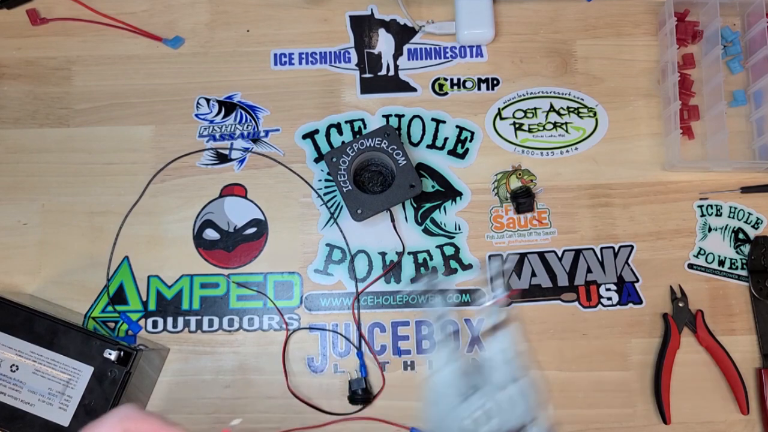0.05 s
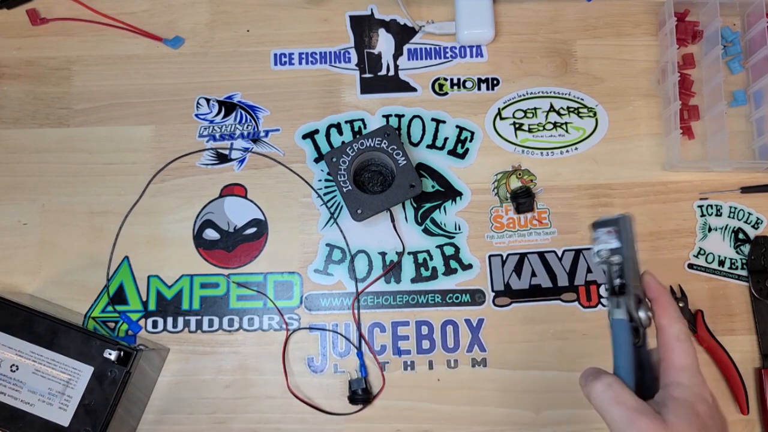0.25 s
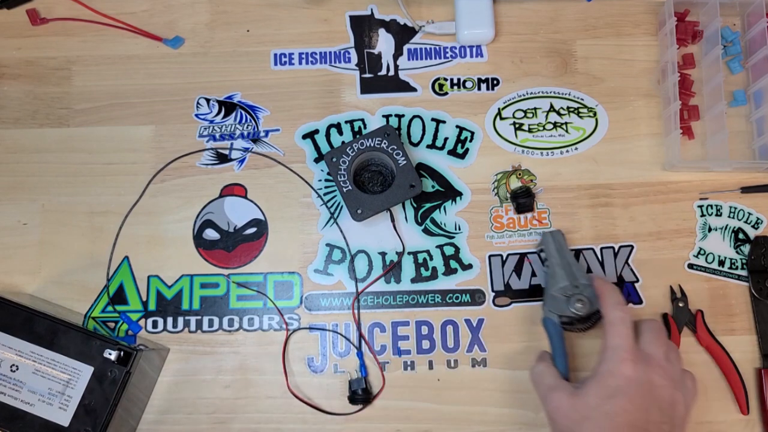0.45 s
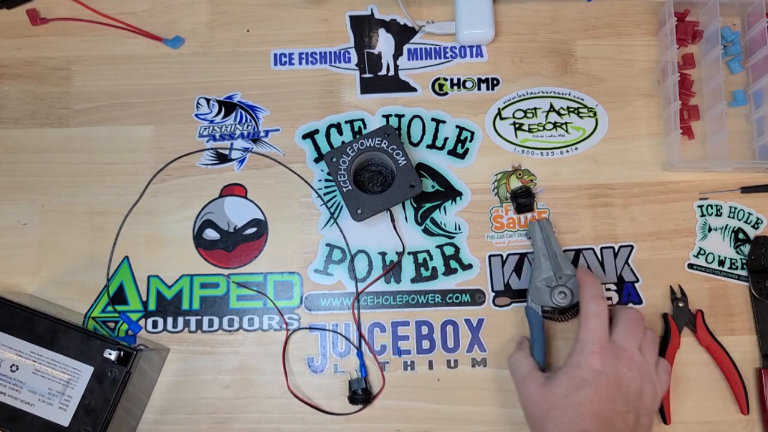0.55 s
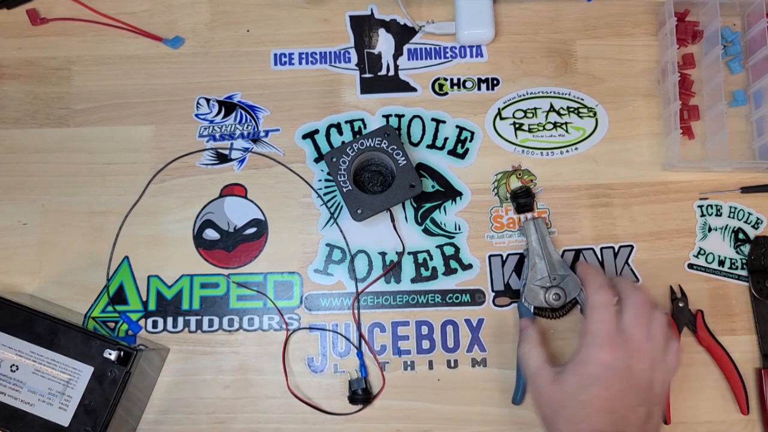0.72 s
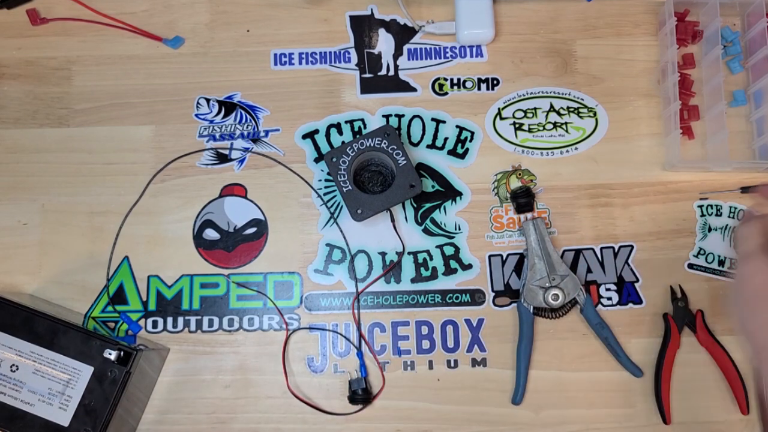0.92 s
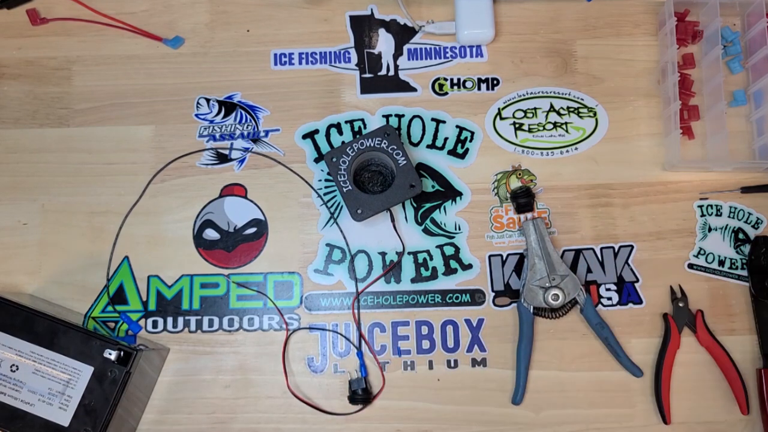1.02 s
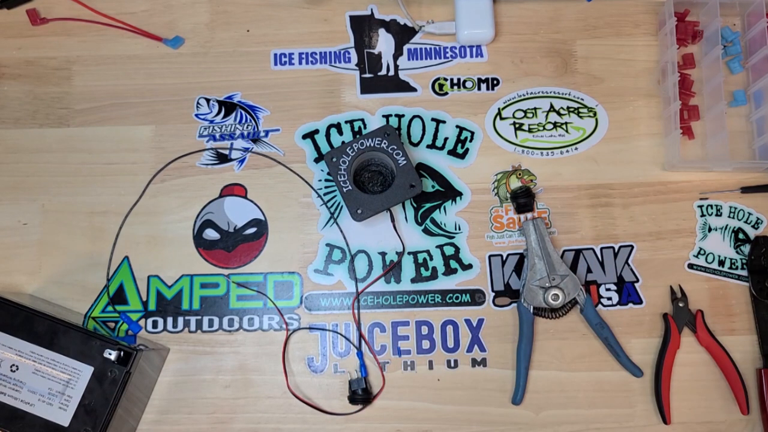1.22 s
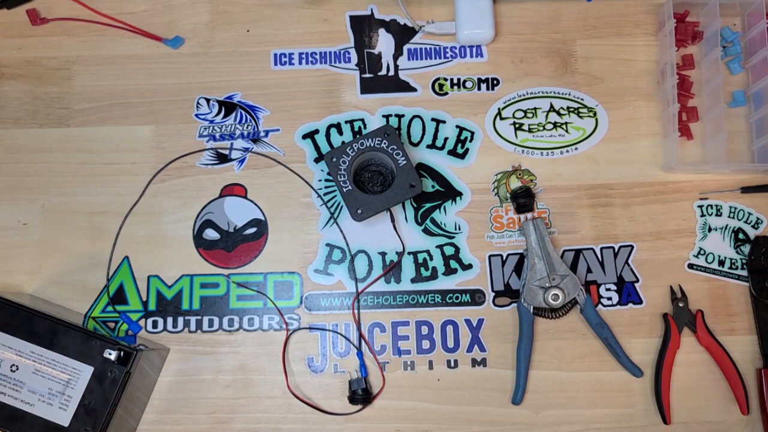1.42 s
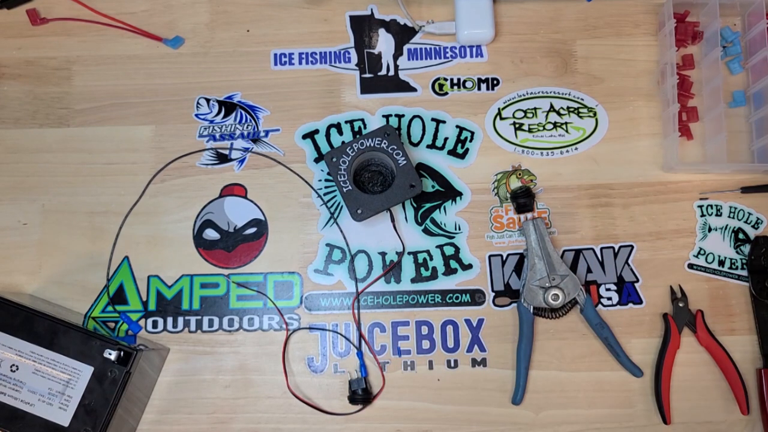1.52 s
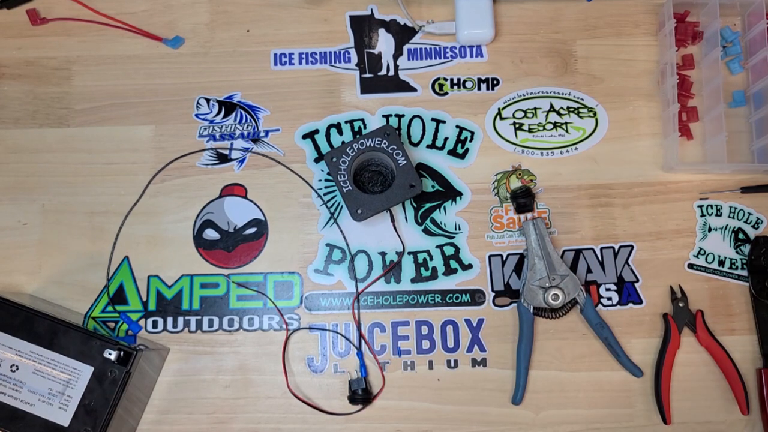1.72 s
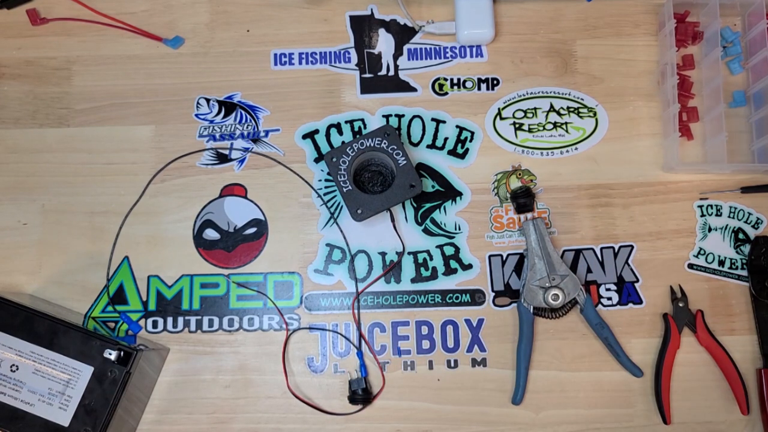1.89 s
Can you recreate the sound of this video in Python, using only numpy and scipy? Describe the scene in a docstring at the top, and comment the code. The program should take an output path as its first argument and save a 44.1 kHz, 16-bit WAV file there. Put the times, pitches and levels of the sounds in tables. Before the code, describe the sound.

In a small workshop with a low humming fan, wire strippers spring open sharply, their head then handles knock on a wooden bench, and a hard object clacks and ticks faintly, heard close in stereo.

```python
"""A ventilation fan rumbles and hums throughout, heard in stereo in a small workshop that answers each hit.
Spring-loaded steel wire strippers snap open, then are laid on a wooden bench: the head knocks first,
the handles follow and the return spring sings. Then, mostly to the right, something hard clacks and is
handled with light ticks, beside faint bumps on the bench. Hits are short bursts of noise shaped in colour,
with decaying sines for ringing; the fan is coloured noise with wavering tones."""
import sys
import numpy as np
from scipy import signal
from scipy.fft import rfft, irfft, next_fast_len
from scipy.io import wavfile
from scipy.ndimage import uniform_filter1d

SR = 44100
rng = np.random.default_rng(int(sys.argv[2]) if len(sys.argv) > 2 else 0)


def pcm_store(signal):
    """Save signal as 16-bit PCM."""
    levels = np.round(np.clip(np.atleast_2d(signal), -1, 1) * 32767)
    wavfile.write(sys.argv[1], SR, levels.astype(np.int16).T)


N = 85995  # length [samples]
T = np.arange(N) / SR  # time [s]
SIZE = next_fast_len(2 * N)  # room for a sound and its echo without wrapping round
FREQS = np.maximum(np.fft.rfftfreq(SIZE, 1 / SR), 1)  # [Hz]
SIDES = np.array([[1], [-1]])  # left, right
STEEL_LATE_MS = 0.3787  # the left microphone hears steel this much later

# left-right balance of sound that arrives from all round: (frequency [Hz], left over right [dB])
SURROUND_BALANCE = [(100, .5), (500, 2), (1300, 3.5), (3000, 3), (6000, -5.5), (12000, -0.5)]


def undb(db):
    """Turn decibels into a gain."""
    return 10 ** (np.asarray(db) / 20)


def unit(x):
    """Scale a sound to a total energy of one."""
    return x / np.sqrt(np.sum(x ** 2))


def read(points, hz):
    """Read a table between its points, with frequency spaced by octaves."""
    f, v = np.array(points, float).T
    return np.interp(np.log(hz), np.log(f), v)


def through(x, response):
    """Pass a sound through an impulse response: each moment of it sets off a copy of the response."""
    return irfft(rfft(x, SIZE) * rfft(response, SIZE), SIZE)[..., :N]


def colour(points, tilt_db=0):
    """Make a unit-energy response with the given spectrum, tilted per octave, that never starts early."""
    octaves = np.log2(np.maximum(FREQS, 100))
    level_db = read(points, FREQS) + tilt_db * octaves
    # fold the cepstrum forward in time: this gives the minimum-phase response
    cepstrum = irfft(np.log(undb(level_db)), SIZE)
    cepstrum[1:SIZE // 2] *= 2
    cepstrum[SIZE // 2 + 1:] = 0
    return unit(irfft(np.exp(rfft(cepstrum)), SIZE)[:N])


def ring(modes):
    """Add up dying sines, one per way a body vibrates; neighbours swing opposite ways; unit energy."""
    total = 0
    for k, (hz, db, t60) in enumerate(modes):
        fade = undb(db - 60 * T / max(t60, .005))
        total = total + (-1) ** k * fade * np.sin(2 * np.pi * hz * T)
    return unit(total)


def pulse(s):
    """Make a single one-sample push at time s."""
    return 1. * (np.arange(N) == max(int(s * SR), 0))


def contact(s, chatter_ms, crack):
    """An impact with dense chatter that swells and dies away, evened out to hold every frequency."""
    rise_ms = 0.96
    ms = T * 1000
    envelope = np.exp(-ms / max(chatter_ms, .2)) * (1 - np.exp(-ms / rise_ms))
    chatter = unit(rng.standard_normal(N) * envelope)
    for _ in range(2):
        spec = rfft(chatter)
        even = irfft(spec / (np.abs(spec) + 1e-9), N)
        chatter = unit(even * envelope ** .4)
    return through(pulse(s), unit(chatter + crack * pulse(0)))


def pair(alike_hz, late_ms):
    """White noise at two microphones: alike in the bass, unrelated in the treble, left one delayed."""
    mid, side = rfft(rng.standard_normal((2, SIZE)))
    alike = 1 / (1 + (FREQS / alike_hz) ** 2)
    both = (mid * np.sqrt(1 + alike) + SIDES * side * np.sqrt(1 - alike)) / np.sqrt(2)
    # half the delay on the left, half as an advance on the right
    lag = np.exp(-1j * np.pi * SIDES * FREQS * late_ms / 1000)
    balance = undb(SIDES * read(SURROUND_BALANCE, FREQS) / 2)
    return irfft(both * lag * balance, SIZE)[:, :N]


def direct(x, pan_db, late_ms):
    """Place a sound by left-over-right level; it reaches the left microphone later."""
    gains = unit(undb(SIDES * pan_db / 2)) * np.sqrt(2)
    lag = np.exp(-2j * np.pi * FREQS * late_ms / 1000)
    left = irfft(rfft(x, SIZE) * lag, SIZE)[:N]
    return gains * np.array([left, x])


def walk(rate):
    """A smoothly wandering level: random values at the given rate [per s], averaged twice."""
    k = int(SR / rate)
    steps = np.repeat(rng.standard_normal(N // k + 1), k)
    return uniform_filter1d(uniform_filter1d(steps, k), k)[:N]


def fan():
    """Moving air rumbles as coloured noise; motor and blades hum as tones of wavering level."""
    # colour of the moving air: (frequency [Hz], relative level per Hz [dB])
    air_colour = [(20, -21), (40, -8), (62, 1.5), (80, 2.5), (105, -5.5), (135, -9.5), (185, -26),
                  (260, -19.5), (450, -23), (600, -26.5), (780, -25), (900, -28), (2200, -38.5),
                  (3300, -40.5), (5500, -55), (10000, -56.5), (16000, -66)]
    # motor and blade tones: (frequency [Hz], rms level before wavering [dB])
    hum = [(76, -54.5), (119.5, -63), (253, -72.5), (360, -71.5), (795, -71), (1083, -81.5), (1114, -74),
           (1836, -85)]
    air = undb(-46) * through(pair(alike_hz=900, late_ms=0.35), colour(air_colour))
    tones = 0
    for hz, db in hum:
        level = undb(db + 0.5 * walk(6.7)) * np.sqrt(2)
        tones = tones + level * np.sin(2 * np.pi * (hz * T + rng.random()))
    return air + tones


def steel(clicks, tone):
    """Steel parts meet, chatter and ring faintly; returns the near sound and what goes into the room."""
    # ringing of the steel: (frequency [Hz], relative level [dB], time to fall 60 dB [s])
    steel_modes = [(2482, -12, .16), (2893, -2, .06), (3588, -8, .05), (3887, -12, .18), (7293, -4, .1),
                   (7450, 2, .18), (11232, -3, .14), (11670, -7, .11), (13720, -2, .09), (14240, -5, .09),
                   (15215, -1, .13), (15575, 3, .12)]
    crack = 0.45  # first impact against the chatter
    near, far, body = 0, 0, ring(steel_modes)
    for s, db, chatter_ms, tilt_db, pan_db, room_db in clicks:
        touch = contact(s, chatter_ms, crack)
        ringing = undb(-14) * through(pulse(s), body)
        x = through(touch + ringing, undb(db) * colour(tone, tilt_db))
        near = near + direct(x, pan_db, STEEL_LATE_MS)
        far = far + undb(room_db) * x
    return near, far


def jaw_snaps():
    """The jaws unlatch and spring back: steel strikes steel in quick succession."""
    # the snaps: (time [s], level [dB], chatter [ms], brightness [dB per octave],
    # left over right [dB], level into the room [dB])
    snaps = [(0.0, -23.5, 6.6, -1, -18, -3), (0.2333, -1, 1.8, 4.3, -10, 0),
             (0.2405, 2.5, 2.5, 1, -18.5, -2), (0.2444, 3, 4.4, 1.5, 22, -4),
             (0.2484, -3.5, 5.3, 4, 9.5, -7)]
    # colour of jaw on jaw: (frequency [Hz], relative level [dB])
    snap_colour = [(150, -61.5), (550, -15.5), (900, -20.5), (2100, -12.5), (2750, -5.5), (3900, -2),
                   (4500, -9.5), (5100, -10), (6500, -10.5), (7400, -5.5), (8500, -10), (13000, -6.5),
                   (15400, -1), (16200, -17.5)]
    return steel(snaps, snap_colour)


def workshop(x):
    """Walls return dense, evenly coloured reflections that build up quickly and fade band by band."""
    # how long the room rings: (frequency [Hz], time to fall 60 dB [s])
    room_t60 = [(100, 0.16), (400, 0.15), (1200, 0.22), (3000, 0.24), (7000, 0.21), (15000, 0.15)]
    gap_ms, build_ms, smooth_hz = 1, 2.6, 90
    spec, tail = rfft(pair(alike_hz=530, late_ms=0), SIZE), 0
    for k, (hz, t60) in enumerate(room_t60):
        # this band's share of the spectrum, crossfading into its neighbours
        share = read([(f, j == k) for j, (f, _) in enumerate(room_t60)], FREQS)
        band = irfft(spec * share, SIZE)[:, :N]
        tail = tail + band * np.exp(-np.log(1000) * T / t60)
    build = np.clip((T * 1000 - gap_ms) / build_ms, 0, 1)
    spec = rfft(tail * build, SIZE)
    # divide out the broad lumps in the spectrum, then set the left-right balance
    lumps = np.sqrt(uniform_filter1d(np.abs(spec) ** 2, int(smooth_hz * SIZE / SR)))
    balance = undb(SIDES * read(SURROUND_BALANCE, FREQS) / 2)
    echo = irfft(spec / lumps * balance, SIZE)[:, :N] * build
    return through(x, unit(echo) * np.sqrt(2))


def steel_taps():
    """Steel parts touch lightly as the tool is laid down."""
    # the taps: (time [s], level [dB], chatter [ms], brightness [dB per octave],
    # left over right [dB], level into the room [dB])
    taps = [(0.147, -39, 3.3, -5, -12, 3), (0.458, -34, 1.3, -5.5, -21, -8),
            (0.4777, -16, 1.7, 1, -19, -7.5), (0.502, -24.5, 2.4, -2, -20, -25),
            (0.611, -32, 1.4, 3, -21, -3.5), (0.66, -5.5, 12, -1, -16, -5),
            (0.6971, -5.5, 4, -4.5, -34, -13), (1.0031, -20.5, 2.2, 18.5, -17, -18)]
    # colour of a light touch: (frequency [Hz], relative level [dB])
    tap_colour = [(300, -15), (2100, -9.5), (2850, 1), (3700, -17.5), (4350, 1.5), (4900, -9.5), (5400, -5),
                  (6300, -7), (7200, -7.5), (8400, -1.5), (10000, -9), (13500, -2), (15400, -3.5),
                  (16200, -2)]
    return steel(taps, tap_colour)


def bench():
    """Each landing flexes the wooden top, rings it and shakes the whole bench."""
    # the tool landing, then faint bumps: (time [s], level [dB], chatter [ms],
    # brightness [dB per octave], thump [dB], left over right [dB], flex [Hz])
    knocks = [(0.4756, 2, 3.6, 2.04, -6.5, 0.5, 580), (0.488, -13.5, 2, 3, -11, 11, 670),
              (0.5197, -11.5, 9, -4, -3, 0, 620), (0.656, 1.5, 3, 4.7, -5.5, -3, 552),
              (0.6948, 8, 3.24, -0.1, -6.5, 4, 430), (1.448, -18.5, 3.5, -5, -4, -1, 790),
              (1.521, -25.5, 5, -1.5, -16, 3.5, 434)]
    # colour of tool on wood: (frequency [Hz], relative level [dB])
    wood_colour = [(60, -25.5), (130, -10), (190, -11.5), (240, -1), (310, -12), (400, -4.5), (650, -4),
                   (850, -10), (1250, -1), (1750, -14), (2200, -34), (4000, -33), (8000, -60), (16000, -62)]
    # ringing of the top, and of the whole bench:
    # (frequency [Hz], relative level [dB], time to fall 60 dB [s])
    wood_modes = [(237, -3, .22), (262, -9, .22), (392, -3, .24), (418, -4, .17), (517, -3, .18),
                  (598, 0, .14), (680, -3, .16), (803, -6, .2), (922, -10, .16), (1022, -5, .19),
                  (1170, -9, .17), (1261, -5, .22), (1315, -3, .25), (1445, -11, .27)]
    frame_modes = [(54.7, 4.5, 0.31), (107.4, 12.5, 0.04), (149, 9, 0.11), (168, -25, 0.027)]
    crack = 0.27  # first impact against the chatter
    near, far, wood, frame = 0, 0, ring(wood_modes), ring(frame_modes)
    for s, db, chatter_ms, tilt_db, thump_db, pan_db, flex_hz in knocks:
        knock = through(contact(s, chatter_ms, crack), colour(wood_colour, tilt_db))
        # the spot under the tool gives way and springs back within a few cycles:
        # multiplying a fast-dying sine by time lets it swell first
        flex = unit(ring([(flex_hz, 0, 0.013)]) * T)
        body = undb(-0.5) * flex + undb(-5.5) * wood + undb(thump_db) * frame
        x = undb(db) * (knock + through(pulse(s), body))
        near = near + direct(x, pan_db, late_ms=0.35)
        far = far + undb(-4.5) * x
    return near, far


def spring():
    """The return spring rings very high as the handles drop."""
    # ringing of the spring: (frequency [Hz], relative level [dB], time to fall 60 dB [s])
    spring_modes = [(15700, 0, .08), (15610, -9, .07), (15100, -9, .08)]
    start_s = 0.662
    x = undb(-8.5) * through(pulse(start_s), ring(spring_modes))
    return direct(x, pan_db=-10, late_ms=STEEL_LATE_MS), undb(-21) * x


def handling(hits, tone):
    """Dry contacts on a hard object whose own ringing dies almost at once."""
    # ringing of the object: (frequency [Hz], relative level [dB], time to fall 60 dB [s])
    object_modes = [(1370, 1, .03), (1780, -4, .035), (2050, -1, .03), (2400, -1, .03), (3140, 1, .04)]
    crack = 0.26  # first impact against the chatter
    near, far, body = 0, 0, ring(object_modes)
    for s, db, chatter_ms, tilt_db, pan_db in hits:
        response = colour(tone, tilt_db) + undb(-14.5) * body
        x = undb(db) * through(contact(s, chatter_ms, crack), response)
        near = near + direct(x, pan_db, late_ms=0.6)
        far = far + undb(-2) * x
    return near, far


def clacks():
    """A hard object clacks, mostly to the right: a tight run of contacts."""
    # the clacks: (time [s], level [dB], chatter [ms], brightness [dB per octave], left over right [dB])
    hits = [(1.375, -20.5, 4, 5, -13), (1.3792, 1, 8.5, 1.5, -10.5), (1.3903, -10.5, 2.3, 5, -37),
            (1.395, -6, 1.47, 2.5, -33), (1.412, -20, 2.8, 2, -26), (1.4228, -11.5, 0.98, -0.5, 1),
            (1.447, -13, 5.7, 0.5, -7)]
    # colour of a clack: (frequency [Hz], relative level [dB])
    clack_colour = [(40, 14), (80, 15.5), (130, -1), (220, -3), (420, -2.5), (750, -4.5), (1100, -3),
                    (1400, 4.5), (2000, -1), (3200, -1.5), (4600, -11.5), (6500, -20), (10000, -29),
                    (15500, -31.5)]
    return handling(hits, clack_colour)


def fiddles():
    """Light ticks and scrapes as the hard object is turned in the hand: faint contacts."""
    # the ticks: (time [s], level [dB], chatter [ms], brightness [dB per octave], left over right [dB])
    ticks = [(1.521, -27, 4.7, -2.5, -16), (1.549, -37, 1, 6, -17), (1.602, -28.5, 6, -0.5, -12),
             (1.6395, -29, 1.44, 3, -20), (1.744, -29, 5.8, 0, -13), (1.8715, -25, 2.3, 0, -12.5),
             (1.884, -24, 4, 0, -23), (1.942, -19.5, 11, 3, -19)]
    # colour of a tick: (frequency [Hz], relative level [dB])
    tick_colour = [(100, -10), (450, 7), (1000, -4), (1500, 11.5), (2350, 10), (2900, 4.5), (4300, 1),
                   (6500, -13.5), (10000, -23.5), (13000, -23), (15500, -24)]
    return handling(ticks, tick_colour)


def scene():
    """All hits, near and through the room, over the fan."""
    sources = [jaw_snaps(), steel_taps(), bench(), spring(), clacks(), fiddles()]
    near, far = zip(*sources)
    return fan() + sum(near) + workshop(sum(far))


def record(dry):
    """The recorder cuts the deepest bass and the top."""
    low_cut_hz, top_hz = 36, 16000
    low_cut = signal.butter(2, low_cut_hz, "high", fs=SR, output="sos")
    top_cut = signal.ellip(8, .2, 70, top_hz, fs=SR, output="sos")
    return signal.sosfilt(top_cut, signal.sosfilt(low_cut, dry))


dry = scene()
out = record(dry)
pcm_store(out)
```